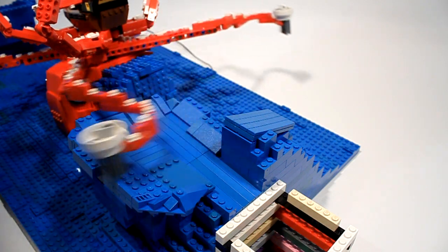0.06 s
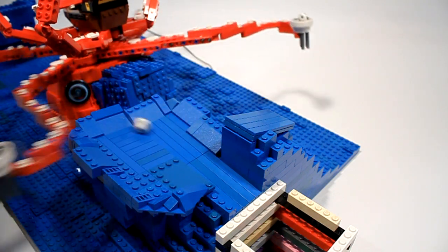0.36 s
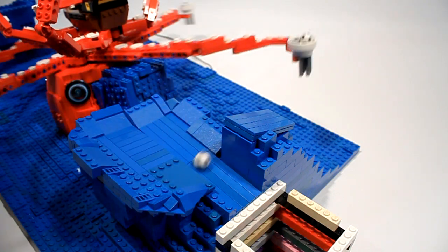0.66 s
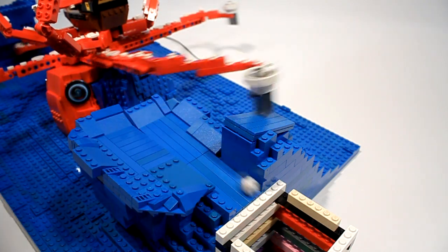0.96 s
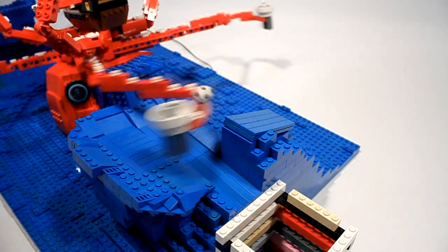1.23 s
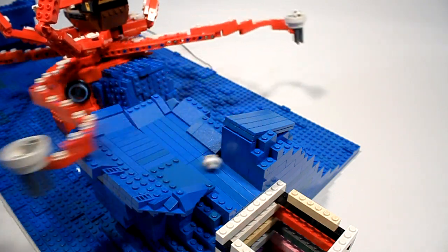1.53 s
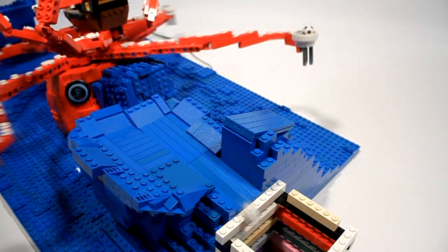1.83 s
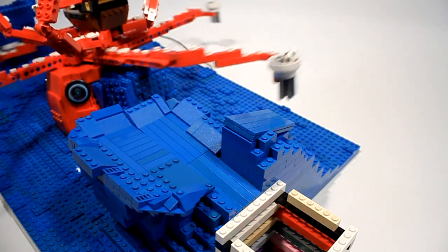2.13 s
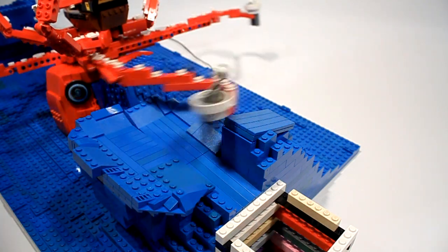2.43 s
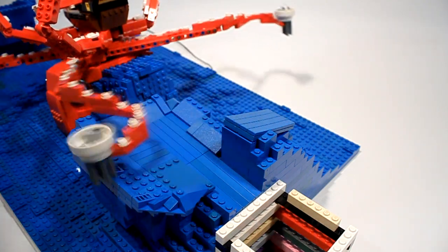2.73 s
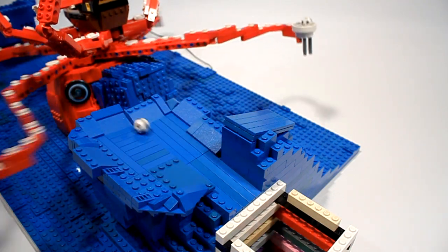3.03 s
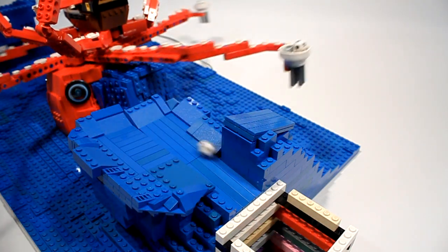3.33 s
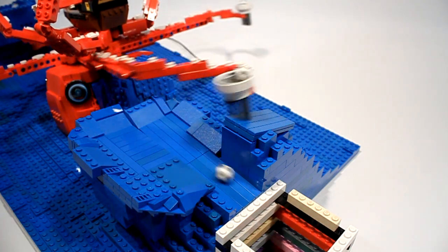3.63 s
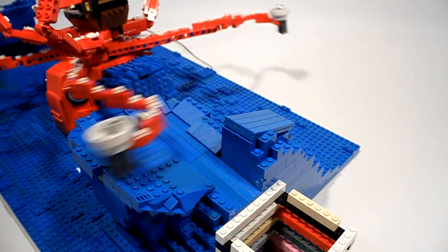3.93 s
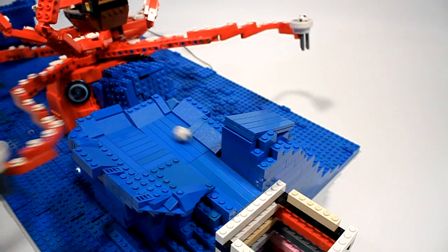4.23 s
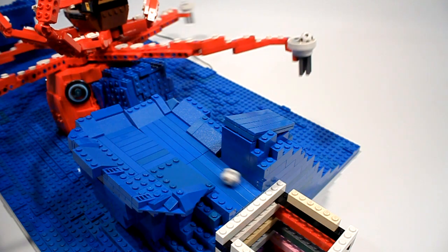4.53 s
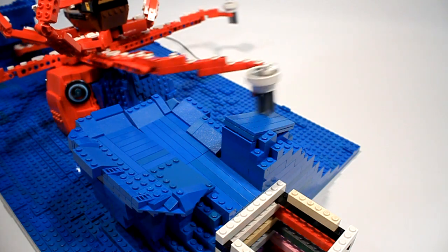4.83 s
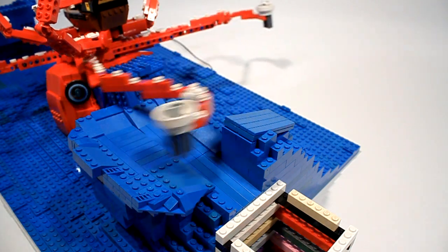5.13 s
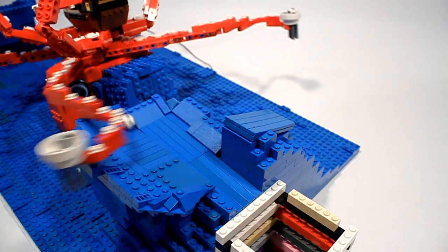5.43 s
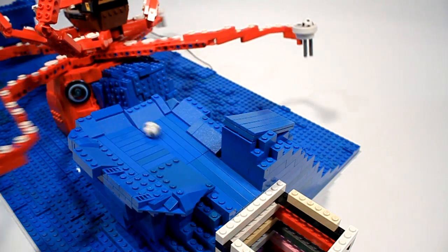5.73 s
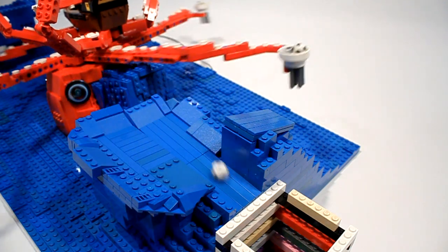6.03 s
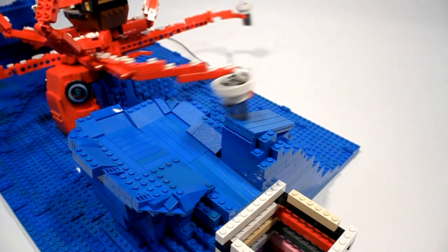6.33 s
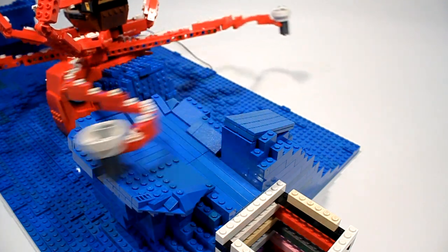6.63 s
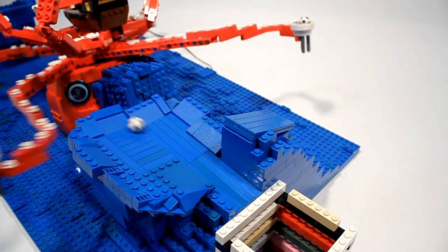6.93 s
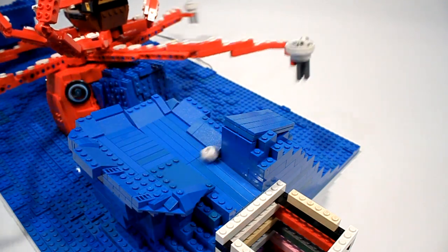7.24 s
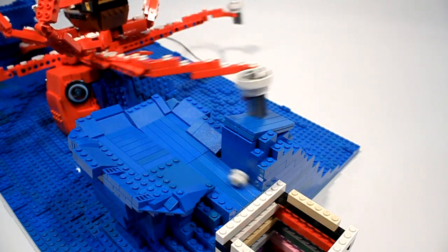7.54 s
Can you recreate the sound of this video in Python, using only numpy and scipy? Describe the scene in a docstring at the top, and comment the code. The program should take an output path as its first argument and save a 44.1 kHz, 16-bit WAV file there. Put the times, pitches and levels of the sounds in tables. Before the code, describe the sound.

Small balls click, roll and tumble through a toy brick mechanism over its fluttering gear rattle and wavering whine.

```python
"""A fluttering plastic rattle and a wavering whine: a motor-driven toy-brick machine runs in a small room.
Its gear teeth clatter and its axles rub, harder each time an arm lifts and loads the drive.
The swinging arms thud, scrape and tick as they pass small balls along.
Over this bed the balls snap onto the bricks, roll and bounce down a ramp and knock about in a hollow bin."""
import sys
import numpy as np
from scipy import signal
from scipy.fft import rfft, irfft, next_fast_len
from scipy.io import wavfile

SR = 44100
rng = np.random.default_rng(int(sys.argv[2]) if len(sys.argv) > 2 else 0)


def pcm_store(signal):
    """Save signal as 16-bit PCM."""
    levels = np.round(np.clip(np.atleast_2d(signal), -1, 1) * 32767)
    wavfile.write(sys.argv[1], SR, levels.astype(np.int16).T)


N = 342657
TIME = np.arange(N) / SR


def from_db(db):
    """Decibels to gain."""
    return 10 ** (np.asarray(db) / 20)


def rms_one(x):
    """Scale to unit power."""
    return x / np.sqrt(np.mean(x ** 2) + 1e-20)


def curve(rows):
    """An automation curve through (time, value) points."""
    return np.interp(TIME, *np.transpose(rows))


def swells(rows):
    """An envelope in which each (start, length, level) row swells and fades."""
    return sum(from_db(db) * np.sin(np.pi * np.clip((TIME - s) / length, 0, 1)) for s, length, db in rows)


def drift(rate):
    """Smooth random modulation with about `rate` swings a second; rms 1."""
    hz = np.arange(N // 2 + 1) * SR / N
    return rms_one(irfft(rfft(rng.standard_normal(N)) / (1 + (hz / rate) ** 2), N))


def contacts(per_s, spread_db):
    """A crackle of tiny impacts of uneven strength; rms 1."""
    sizes = from_db(spread_db * np.minimum(rng.exponential(1, N), 3)) * rng.choice([-1, 1], N)
    return rms_one(sizes * (rng.random(N) < per_s / SR))


def bandpass(x, band_hz):
    """Roll off the bass and the top."""
    return signal.sosfilt(signal.butter(2, band_hz, "band", fs=SR, output="sos"), x)


def resonate(force, hz, width):
    """A resonance with gain 1 at its peak and none in the deep bass."""
    r, w = np.exp(-np.pi * width / SR), 2 * np.pi * hz / SR
    feed = np.array([1, 0, -1]) * (1 - r * r) / 2
    return signal.lfilter(feed, [1, -2 * r * np.cos(w), r * r], force + 1e-18)


def ring_part(force, modes, band_hz):
    """A running force rings the modes of a plastic part; rms 1."""
    ringing = sum(from_db(db) * resonate(force, hz, width) for hz, width, db in modes)
    return rms_one(bandpass(ringing, band_hz))


def disperse(x, corner_hz):
    """Bending waves carry the treble faster than the bass, which smears the attack."""
    a = np.exp(-2 * np.pi * corner_hz / SR)
    for _ in range(4):
        x = signal.lfilter([-a, 1], [1, -a], x)
    return x


def blows(rows, modes, contact_s, chatter_s, settle_db, note_width_hz, band_hz, smear_hz, gain_db):
    """Each blow is a brief contact, then a dying chatter of loose joints, rung through the part's modes."""
    settle_s, touches_per_s = 0.048, 12000
    t = TIME[:SR // 10]
    out = np.zeros(N + len(t))
    hz, width, mode_db = np.transpose(modes)
    octaves = np.log2(hz) - np.mean(np.log2(hz))
    dying = np.exp(-t / chatter_s) + from_db(settle_db) * np.exp(-t / settle_s)
    for s, level_db, tilt_db, chatter_db, note_hz, note_db in rows:
        contact, chatter = rng.standard_normal((2, len(t))) * [np.exp(-t / contact_s), dying]
        chatter *= rng.random(len(t)) < touches_per_s / SR
        force = rms_one(contact) + from_db(chatter_db) * rms_one(chatter)
        gains = from_db(mode_db + np.clip(tilt_db, -9, 9) * octaves + 1.5 * rng.standard_normal(len(hz)))
        body = sum(g * resonate(force, f, w) for g, f, w in zip(gains, hz, width))
        note = resonate(force, note_hz, note_width_hz)  # the struck brick's own pitch
        # small parts radiate little bass, and the give of the plastic dulls the top
        radiated = bandpass(rms_one(body) + from_db(note_db) * rms_one(note), band_hz)
        hit = disperse(radiated, smear_hz)
        at = int(s * SR)
        out[at:at + len(t)] += from_db(level_db + gain_db) * hit / np.std(hit[t < .01])
    return out[:N]


def key_track(rows, middle_hz, db_per_octave, note_db):
    """Give each blow a tilt and a note level: smaller parts have a higher note and a brighter blow."""
    return [(s, db, db_per_octave * np.log2(hz / middle_hz), chatter_db, hz, note_db)
            for s, db, chatter_db, hz in rows]


def hum(hz=57, level_db=-82):
    """A faint, steady low tone under everything."""
    return from_db(level_db) * rms_one(np.sin(2 * np.pi * hz * TIME))


def room(x, t60_s=0.19, wall_cut_hz=7900, first_echo_s=0.0018):
    """Dense, slightly dull reflections from table and walls."""
    t = TIME[:SR // 2]
    tail = rng.standard_normal(len(t)) * from_db(-60 * t / t60_s) * np.clip(t / first_echo_s - 1, 0, 1)
    tail = signal.sosfilt(signal.butter(1, wall_cut_hz, fs=SR, output="sos"), tail)
    return signal.fftconvolve(x, tail / np.linalg.norm(tail))[:N]


# arm lifts: (time [s], hold [s], first load [dB], last load [dB], release [s], slack after [dB])
LIFTS = [(-0.5, 0.41, -3, -2.5, 0.17, -5), (0.6, 0.58, 0.9, 0.5, 0.18, -5),
         (1.943, 0.63, -2, -1.5, 0.042, -6.5), (2.978, 0.9, -2.5, -0.5, 0.14, -4.5),
         (4.625, 0.22, 1, 0.5, 0.26, -6.5), (5.887, 0.59, -1.5, -1, 0.25, -5.5),
         (7.22, 0.65, -2, 2, 0.2, -6)]


def load(take_up_s=0.23):
    """Load on the drive in dB: each lift takes up the slack, holds and lets go."""
    corners, before_db = [], LIFTS[0][5]
    for s, hold_s, first_db, last_db, release_s, slack_db in LIFTS:
        corners += [(s - take_up_s, before_db), (s, first_db)]
        corners += [(s + hold_s, last_db), (s + hold_s + release_s, slack_db)]
        before_db = slack_db
    return curve(sorted(corners))


# pace of the rattle's flutter: (time [s], rate [Hz])
THROB_RATE = [(0.0, 11.77), (0.41, 10.69), (0.85, 12.81), (1.35, 10.48), (2.28, 12.53), (2.74, 11.12),
              (3.04, 13.55), (3.78, 11.0), (4.46, 10.86), (4.63, 12.02), (4.97, 11.26), (5.69, 10.78),
              (6.22, 12.98), (6.5, 10.66), (7.14, 11.75), (7.77, 13.21)]


def throb(first_peak_s=0.059):
    """The drive tightens and eases like an unevenly turning gear; swings between -1 and 1."""
    turns = np.cumsum(curve(THROB_RATE)) / SR
    return np.cos(2 * np.pi * (turns - np.interp(first_peak_s, TIME, turns)))


# broad tone colour of the running machine: (frequency [Hz], level [dB])
MACHINE_COLOUR = [(18, -71), (30, -66), (86, -21.5), (215, -23), (287, -16.5), (415, -16.5), (600, -6),
                  (721, -6.5), (1010, -4.5), (1220, -5), (1350, -4), (4910, -0.5), (5740, -8),
                  (12000, -8.5), (14800, -17), (16000, -22)]
# peaks and notches of the brick frame: (frequency [Hz], width [Hz], boost [dB])
FRAME_PEAKS = [(257.4, 27, 5.5), (397, 250, 5.5), (607, 44, 5), (765, 23, 10), (779, 40, -6.5),
               (920, 36, 4), (984, 27, 4), (1300, 110, -3.5), (1353, 29, 8), (1720, 23, 2.5),
               (1956, 44, -4), (2217, 28, -14), (2700, 220, 1), (3260, 60, 4.5), (3740, 880, -5),
               (4050, 60, 3), (5010, 230, 2.5), (5450, 160, 3.5), (6070, 290, 3.5), (6720, 300, 3),
               (7360, 240, -1.5), (7770, 380, 5), (9340, 340, 2), (10800, 270, -1.5), (12450, 500, -4),
               (13450, 500, 4)]


def through_frame(force, low_hz, high_hz, ripple_db=1.9):
    """One band of the frame's response: its main resonances and the ripple of many small ones; rms 1."""
    size = next_fast_len(N)
    hz = np.arange(1, size // 2 + 2) * SR / size
    points_hz, points_db = np.transpose(MACHINE_COLOUR)
    colour_db = np.interp(np.log(hz), np.log(points_hz), points_db)
    for centre, width, boost in FRAME_PEAKS:
        colour_db += boost / (1 + (2 * (hz - centre) / width) ** 2)
    ripple_hz = np.geomspace(1000, 16000, 400)
    colour_db += ripple_db * np.interp(hz, ripple_hz, rng.standard_normal(len(ripple_hz)), left=0)
    band = 1 / np.sqrt((1 + (low_hz / hz) ** 12) * (1 + (hz / high_hz) ** 12))
    return rms_one(irfft(rfft(force, size) * from_db(colour_db) * band, size)[:N])


def loose_pins(count=36, width_hz=70, gain_db=-38):
    """Pins and links shaken by the drive tinkle briefly, each at its own pitch, louder under load."""
    taps = contacts(per_s=380, spread_db=4.5)
    tapped_pin = rng.integers(0, count, N)
    pitches = np.geomspace(1100, 7000, count) * (1 + .015 * rng.standard_normal(count))
    rings = sum(resonate(taps * (tapped_pin == k), hz, width_hz) for k, hz in enumerate(pitches))
    return from_db(gain_db + load()) * through_frame(rings, 1580, 8200)


# faint tones of the faster gears: (pitch [Hz], level [dB])
GEAR_TONES = [(925, -49.5), (1025, -50), (1342, -48), (1700, -51)]
# the main mesh sings in spurts during the lifts: (time [s], length [s], level [dB])
MESH_SPURTS = [(0.56, 0.096, -37.5), (0.65, 0.1, -36), (0.79, 0.13, -44.5), (0.96, 0.12, -37.5),
               (1.08, 0.21, -50), (1.86, 0.11, -39), (2.03, 0.15, -48), (2.26, 0.15, -40.5),
               (3.4, 0.38, -50), (4.56, 0.2, -41), (5.83, 0.098, -41.5), (5.92, 0.082, -35),
               (6.0, 0.12, -44), (7.12, 0.091, -43), (7.44, 0.1, -40), (7.54, 0.07, -35)]


def gear_whine(mesh_hz=591.5, wobble=0.032):
    """Meshing teeth sing rough tones that waver with the motor's speed and grow with the load."""
    load_db = load()
    phase_per_hz = 2 * np.pi * np.cumsum(1 + wobble * drift(rate=35.9)) / SR
    mesh = np.sin(mesh_hz * phase_per_hz) * from_db(3.5 * drift(rate=28))
    mesh += from_db(-15) * np.sin(mesh_hz * phase_per_hz / 2)  # alternate teeth add a sub-octave
    mesh_level = from_db(-3.5) * (from_db(-51 + load_db) + swells(MESH_SPURTS))
    fast_gears = np.zeros(N)
    for hz, db in GEAR_TONES:
        tone = np.sin(hz * phase_per_hz + 0.9 * drift(rate=42))
        fast_gears += from_db(db) * rms_one(tone * from_db(2.0 * drift(rate=32)))
    return mesh_level * rms_one(mesh) + from_db(-2.5 + 0.24 * load_db) * fast_gears


# level of the midrange rattle, sinking in the slack between lifts: (time [s], level [dB])
RATTLE_LEVEL = [(0, -36.5), (0.25, -42), (0.7, -38.5), (1.1, -36.5), (1.45, -43), (1.9, -39), (2.45, -39),
                (2.8, -48.5), (3.1, -40), (3.75, -40), (4.7, -38.5), (5.4, -41.5), (6.3, -37), (6.9, -44),
                (7.77, -35)]
# the teeth catch and grind for a moment: (time [s], length [s], level [dB])
CATCHES = [(0.82, 0.05, -47), (0.9, 0.059, -37), (1.875, 0.06, -35), (2.28, 0.092, -37),
           (2.96, 0.057, -38.5), (3.195, 0.045, -42), (3.345, 0.058, -32), (3.578, 0.044, -31.5),
           (4.598, 0.037, -42), (6.79, 0.076, -39), (7.13, 0.062, -40)]


def gear_train(plate_lag_s=0.15):
    """Teeth clatter through their backlash and axles rub, in an uneven flutter that shakes the frame."""
    load_db = load()
    flutter = throb() * (.85 - 0.04 * load_db + 0.58 * drift(rate=23))  # slack deepens the throb
    plate_db = np.interp(TIME - plate_lag_s, TIME, load_db)  # the base plate's shaking trails the load
    teeth = contacts(per_s=4000, spread_db=2.9) + .4 * rng.standard_normal(N)
    friction = contacts(per_s=5000, spread_db=2.7) + .8 * rng.standard_normal(N)
    surge, grip, sway = drift(rate=70), drift(rate=110), drift(rate=7)
    rattle_db = curve(RATTLE_LEVEL) + 0.075 * flutter + surge
    chatter_db = -36 + load_db + 2.0 * flutter + 1.3 * surge + 0.14 * grip
    rub_db = -36.5 + 1.26 * load_db + 2.0 * flutter + 2.05 * surge + 1.44 * grip
    hollow_db = -45.5 + 0.72 * load_db + 0.8 * flutter
    rumble_db = -59.5 + 0.95 * plate_db + 0.5 * flutter + 2.2 * sway
    return (from_db(rattle_db) * through_frame(teeth, 905, 2390)
            + from_db(chatter_db) * through_frame(teeth, 3080, 4680)
            + from_db(rub_db) * through_frame(friction, 5540, 15000)
            + from_db(hollow_db) * through_frame(teeth, 250, 770)
            + from_db(rumble_db) * through_frame(teeth, 55, 245)
            + swells(CATCHES) * through_frame(teeth, 2100, 10500))


# soft thuds at the ends of the arms' swing: (time [s], level [dB])
JOLTS = [(0.094, -37), (0.726, -56), (1.133, -44), (2.42, -49), (2.69, -49), (2.742, -47), (3.32, -55),
         (3.741, -49), (3.81, -47), (5.349, -43), (6.42, -48), (7.28, -54), (7.697, -52)]


def arm_jolts(plate_hz=165, width_hz=95, push_s=0.015, gain_db=2.0):
    """A soft push from an arm sets the base plate thudding."""
    t = TIME[:SR // 8]
    out = np.zeros(N + len(t))
    for s, level_db in JOLTS:
        push = rng.standard_normal(len(t)) * np.exp(-t / push_s)
        thud = resonate(resonate(push, plate_hz, width_hz), plate_hz, 2 * width_hz)
        at = int(s * SR)
        out[at:at + len(t)] += from_db(level_db + gain_db) * thud / np.abs(thud).max()
    return out[:N]


# thin, bright ring of an arm: (frequency [Hz], width [Hz], level [dB])
ARM_MODES = [(1020, 150, -8), (2240, 1900, 4), (4060, 2700, 5), (6400, 2000, 4.5), (8500, 1100, -4),
             (10500, 2400, 8), (11400, 440, 7), (14300, 3100, 11)]
# joints scraping as the arms swing past: (time [s], length [s], level [dB])
RASPS = [(0.05, 0.049, -59), (1.135, 0.12, -44), (2.45, 0.11, -47), (2.69, 0.025, -49),
         (2.738, 0.016, -38.5), (3.735, 0.045, -41), (5.055, 0.023, -48), (5.125, .04, -41),
         (5.383, 0.028, -42), (6.407, 0.058, -45), (7.686, 0.058, -45)]


def joint_rasps(gain_db=8.5):
    """A dry joint slips in quick tiny jerks that ring the arm; each scrape swells and fades."""
    slips = contacts(per_s=1400, spread_db=5.0)
    return from_db(gain_db) * swells(RASPS) * ring_part(slips, ARM_MODES, band_hz=(5000, 14500))


# thin ticks of the arms: (time [s], level [dB], chatter [dB], note [Hz])
TICKS = [(0.069, -30, 9, 5500), (0.095, -29, 9, 10300), (0.1053, -26, -6, 4060), (0.129, -24, 4, 10800),
         (0.1353, -27, -7, 14400), (1.158, -26, -11, 6740), (1.1666, -20, -14, 11600),
         (1.2177, -29, -6, 11700), (1.268, -34, 1, 4960), (1.3655, -24, -12, 9300), (2.4578, -27, -3, 6250),
         (2.4657, -20.5, -20, 11400), (2.4973, -24, 3, 11300), (2.5243, -27.5, -3, 6150),
         (2.696, -36.5, -2, 9500), (2.7373, -32, -5, 14000), (2.7445, -21.5, -4, 10800),
         (3.7445, -22.5, -4, 5560), (3.776, -25, 0, 5600), (3.761, -28, -7, 12300),
         (3.8135, -28, -4, 13500), (3.9805, -35, -8, 10500), (4.063, -29, 6, 9300), (5.054, -30, -1, 6850),
         (5.0606, -26.5, -5, 11240), (5.1086, -26, 15, 6500), (5.1325, -30, 3, 10900),
         (5.1524, -26.5, 7, 4200), (5.3262, -28.5, 1, 10400), (5.351, -30.5, 0, 11000),
         (5.3873, -29, 22, 7040), (6.4256, -24, -18, 11800), (6.4545, -26, -3, 12400),
         (6.4903, -26.5, -16, 10900), (6.639, -30, 1, 11900)]


def arm_ticks():
    """Loose parts tap the arms and ring their high modes."""
    ticks = key_track(TICKS, middle_hz=10900, db_per_octave=8.0, note_db=-4.5)
    return blows(ticks, ARM_MODES, contact_s=0.00078, chatter_s=0.008, settle_db=-39,
                 note_width_hz=380, band_hz=(1200, 13000), smear_hz=8700, gain_db=-0.7)


# hollow body of the bin: (frequency [Hz], width [Hz], level [dB])
BIN_MODES = [(432, 290, 3.5), (594, 120, -6), (800, 160, 6), (1020, 120, 13), (1340, 70, 9.5),
             (1580, 110, 3), (1760, 260, 2), (2300, 690, -11), (3050, 1100, 1), (4400, 550, -13),
             (7840, 4400, -35)]
# single knocks in the bin: (time [s], level [dB], chatter [dB], note [Hz])
KNOCKS = [(1.366, -38, 0, 950), (3.9022, -25, 15, 920), (3.956, -34, -1, 920), (5.2365, -26.5, 9, 920),
          (5.2751, -29.5, -3, 1020), (5.458, -37, 0, 1110), (5.488, -29, 2, 1620), (5.496, -28.5, 6, 1580),
          (5.5334, -25, 3, 1020), (5.548, -40, -6, 1340), (5.5655, -27.5, -2, 1330), (5.595, -30, 0, 1040),
          (5.608, -30, -7, 982), (5.625, -26, 0, 1620), (5.632, -30.5, -3, 1080), (5.648, -33, 0, 1600),
          (5.657, -30.5, -3, 960), (5.701, -33, -4, 930), (5.7651, -28, 3, 1040), (5.822, -35, -2, 1330),
          (5.952, -30, -9, 1040), (5.974, -29, 0, 1030), (6.0083, -25.5, -6, 1020), (6.1996, -19, 18, 865),
          (6.2075, -28, 4, 1530), (6.2183, -20, 21, 1860), (6.253, -25, 2, 1020), (6.2604, -23, 11, 1940),
          (6.268, -24, -7, 1010), (6.413, -30.5, 2, 720), (6.5352, -27.5, 3, 1150), (6.6102, -26.5, 5, 900),
          (7.515, -25, -7, 970), (7.5365, -23, -1, 1060), (7.546, -29, 4, 1080), (7.558, -31, -1, 1060),
          (7.571, -33, -8, 1070), (7.6268, -23, -10, 1016), (7.658, -28, 4, 1040), (7.671, -34, 0, 980),
          (7.6955, -19, -6, 1340), (7.715, -16.5, 6, 1505), (7.727, -29, 2, 1540), (7.744, -34, -2, 1020),
          (7.7536, -21.5, 2, 930), (7.766, -28, 6, 1000)]
# a ball tumbles about: (time [s], length [s], level [dB])
TUMBLES = [(5.15, 0.12, -38), (5.47, 0.28, -38), (5.92, 0.1, -38), (6.18, 0.26, -32), (7.5, 0.095, -36)]


def balls_in_bin():
    """Balls ring the hollow bin with distinct knocks and the dense soft bumps of tumbling."""
    rows = key_track(KNOCKS, middle_hz=1200, db_per_octave=2.0, note_db=-1.0)
    knocks = blows(rows, BIN_MODES, contact_s=0.00064, chatter_s=0.0055, settle_db=-11,
                   note_width_hz=88, band_hz=(310, 10400), smear_hz=1320, gain_db=-1.5)
    tumbling = ring_part(contacts(per_s=1000, spread_db=2.0), BIN_MODES, band_hz=(320, 12000))
    return knocks + from_db(-2.5) * swells(TUMBLES) * tumbling


# clacky body of the ramp: (frequency [Hz], width [Hz], level [dB])
RAMP_MODES = [(1100, 220, -43), (1660, 270, 10.5), (2300, 320, 13.5), (3150, 940, 10.5), (4050, 700, 10.5),
              (4700, 460, -31), (6040, 550, -30), (8700, 2100, -1), (11800, 3200, -4)]
# clear bounces on the ramp; the one at 1.0069 s is a tick of an arm: (time [s], level [dB], chatter [dB], note
# [Hz])
BOUNCES = [(0.9527, -28, 3, 1900), (1.0069, -26.5, 14, 5400), (1.4907, -28.5, -4, 2560),
           (1.6649, -28.5, 4, 2650), (1.7175, -34, 1, 2590), (1.8327, -33, -8, 4100),
           (2.027, -29.5, 1, 1770), (3.0142, -25.5, -11, 4200), (3.0524, -28, -9, 2300),
           (3.127, -26, -2, 1640), (3.1941, -33, -5, 4580), (3.2771, -28, -4, 4400),
           (3.4726, -26, -5, 4200), (3.506, -31, -4, 3070), (3.5208, -22, -3, 3400),
           (3.6785, -35, -11, 4500), (3.7201, -25.5, -1, 4140), (3.7604, -21, 3, 5400),
           (3.8024, -22.5, 0, 2240), (3.815, -20.5, -2, 3930), (3.865, -27.5, -5, 2370),
           (3.917, -28.5, 0, 4200), (3.9682, -24, 15, 3400), (4.0736, -28.5, -7, 1800),
           (4.0934, -24.5, 9, 2710), (4.165, -30.5, -2, 4050), (4.191, -37, -3, 4860),
           (4.209, -32, 0, 3900), (4.2324, -27, -2, 4200), (4.2542, -23.5, -2, 4050),
           (4.3018, -24, -4, 4630), (4.3429, -27, -6, 4030), (4.369, -33, 0, 3230), (4.4004, -35, -2, 4300),
           (4.603, -26, 0, 4370), (6.2722, -25.5, 3, 5490), (6.3563, -25.5, 10, 1920),
           (6.3795, -28, 3, 2320), (6.6392, -31.5, 3, 2790), (7.2403, -33, -5, 4940)]
# a ball rolls over the studs: (time [s], length [s], level [dB])
ROLLS = [(0.75, 0.77, -36), (1.55, 0.43, -50), (3.12, 0.8, -37), (3.95, 0.67, -34)]


def balls_on_ramp():
    """Balls ring the ramp as they bounce, and bump softly over its studs as they roll."""
    rows = key_track(BOUNCES, middle_hz=4200, db_per_octave=11.0, note_db=-6.5)
    bounces = blows(rows, RAMP_MODES, contact_s=0.0022, chatter_s=0.0088, settle_db=-7,
                    note_width_hz=180, band_hz=(770, 6800), smear_hz=2400, gain_db=1.0)
    rolling = ring_part(contacts(per_s=360, spread_db=4.5), RAMP_MODES, band_hz=(640, 2100))
    return bounces + from_db(-4.0) * swells(ROLLS) * rolling


# hard ring of the bricks: (frequency [Hz], width [Hz], level [dB])
BRICK_MODES = [(564, 150, -9), (1600, 230, -2), (1860, 290, 6.5), (2420, 290, 7.5), (3400, 1100, 0),
               (4050, 610, 1), (4960, 330, 1), (6250, 840, -22), (8760, 8900, -8.5), (12400, 3000, -48)]
# snaps of a ball on the bricks; those at 1.3655, 3.9018, 5.2361 and 6.6098 s are the ball striking the bin,
# which knocks at the same moments: (time [s], level [dB], tilt [dB/octave, limited to +-9], chatter [dB], note
# [Hz], note level [dB])
SNAPS = [(1.1866, -16, -3, -2, 1790, -20), (1.3319, -19.5, -1, -13, 1900, 4),
         (1.3358, -23.5, 7, -8, 2410, -7), (1.3655, -19, 9, -5, 3870, -14), (1.9719, -19, 15, -11, 1780, 7),
         (1.9837, -19, 0, -3, 1910, 5), (2.0443, -29, -11, -18, 1720, 14), (2.1657, -28, -1, -6, 1550, 2),
         (2.5687, -11, -3, -10, 3030, -2), (3.9018, -23, 9, -3, 13400, 9),
         (3.9554, -18.5, -4, -9, 1900, -9), (4.8234, -14, -5, -3, 1820, 1),
         (4.9588, -22.5, -9, -20, 1920, 11), (5.0046, -30.5, -13, -10, 1720, 9),
         (5.128, -27, 2, 1, 1880, -10), (5.2361, -20.5, 9, -1, 4200, -7), (6.3141, -18, 3, -6, 1900, 12),
         (6.3236, -25.5, -11, -8, 2140, -1), (6.6098, -18, 0.5, 0, 4300, -6)]


def ball_snaps():
    """A ball hits the bricks, or the wall of the bin, with a hard, near-instant contact: a sharp crack and a
    short chatter."""
    return blows(SNAPS, BRICK_MODES, contact_s=0.00001, chatter_s=0.0037, settle_db=-36,
                 note_width_hz=470, band_hz=(450, 10300), smear_hz=4940, gain_db=1.0)


def scene(room_send_db=-16.5):
    """Mono mix: hum and machine stay dry; the balls and ticks get a touch of room."""
    hits = ball_snaps() + balls_on_ramp() + arm_ticks() + balls_in_bin()
    machine = gear_train() + loose_pins() + gear_whine() + arm_jolts() + joint_rasps()
    return (hum() + machine + hits + from_db(room_send_db) * room(hits))[None]


def record(dry, ceiling=0.81, cutoff_hz=15600):
    """The overloaded input soft-clips the hardest snaps; a steep low-pass cuts the top."""
    rounded = dry / (1 + (dry / ceiling) ** 6) ** (1 / 6)
    return signal.sosfilt(signal.ellip(10, .1, 70, cutoff_hz, fs=SR, output="sos"), rounded)


dry = scene()
out = record(dry)
pcm_store(out)
```